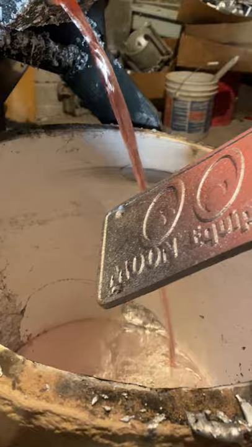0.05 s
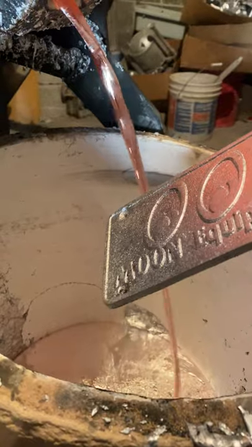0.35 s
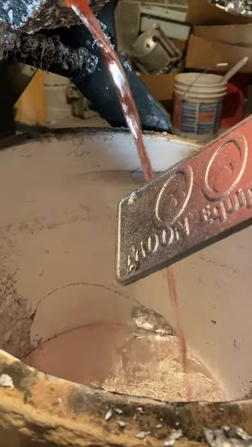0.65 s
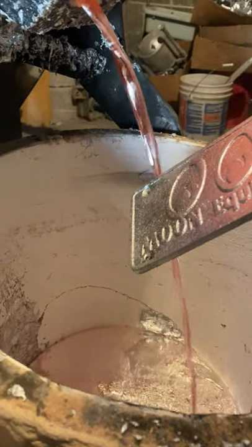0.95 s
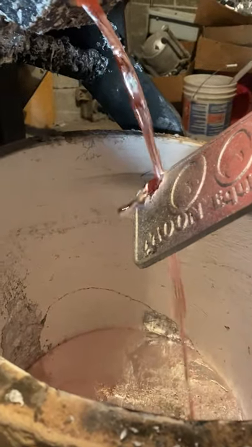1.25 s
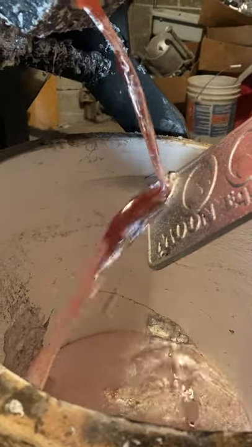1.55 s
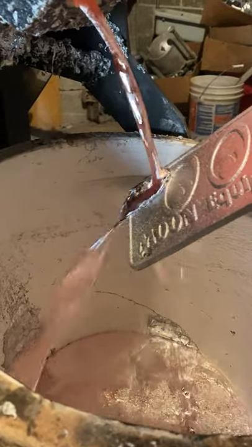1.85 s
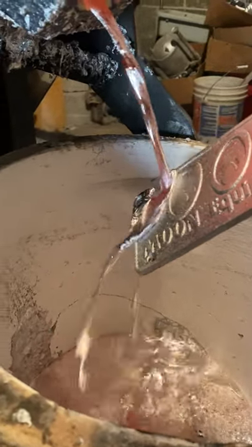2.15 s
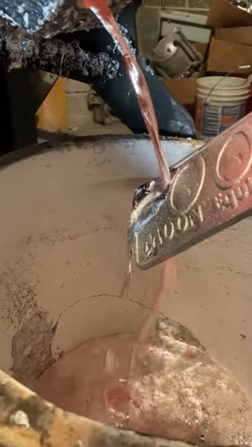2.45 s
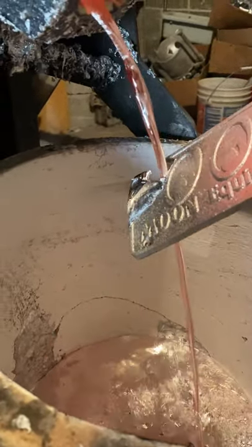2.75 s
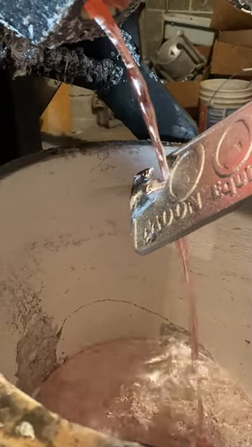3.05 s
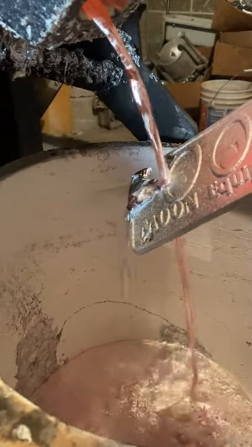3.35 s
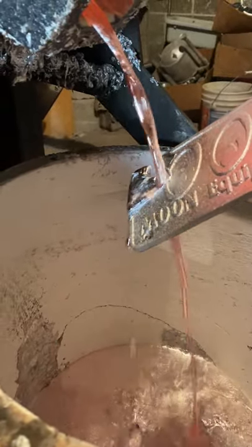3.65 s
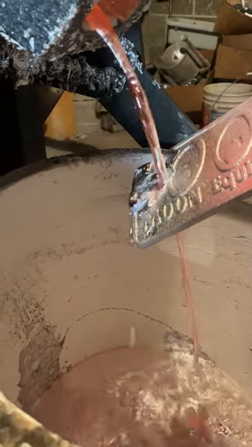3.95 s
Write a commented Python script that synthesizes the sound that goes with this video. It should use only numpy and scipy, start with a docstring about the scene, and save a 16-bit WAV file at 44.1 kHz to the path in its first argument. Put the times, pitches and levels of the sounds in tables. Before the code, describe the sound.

A melting furnace roars steadily in a workshop, with a low, surging boom and a hollow note. Its blower adds a faint hiss and whine. Near the end, spattering metal ticks softly. The stereo microphone is close.

```python
"""A low, surging boom over a broad roar: a melting furnace burns steadily in a workshop.
Turbulence in the flame drives the resonances of the chamber and a hollow note at its mouth, while
the blower adds the hiss of its air jet and a faint whine. A thin stream of metal is poured in
silence, apart from a few ticks of spatter near the end. The close stereo microphone's limiter
holds the boom down."""
import sys
import numpy as np
from scipy import signal
from scipy.fft import rfft, irfft
from scipy.io import wavfile
from scipy.ndimage import uniform_filter1d, minimum_filter1d

SR = 44100
rng = np.random.default_rng(int(sys.argv[2]) if len(sys.argv) > 2 else 0)


def inscribe(sig):
    """Save sig as 16-bit PCM at rate SR to the path in sys.argv[1].

    A 1-D sig is mono; a 2-D sig holds one channel per row.
    Samples are clipped to [-1, 1] before scaling.
    """
    pcm = np.round(np.clip(np.atleast_2d(sig).T, -1, 1) * 32767)
    wavfile.write(sys.argv[1], SR, pcm.astype(np.int16))


N = 176400
HZ, TIME = np.fft.rfftfreq(N, 1 / SR), np.arange(N) / SR


def amp(db):
    """Amplitude ratio: tenfold for every 20 decibels."""
    return 10 ** (np.asarray(db) / 20)


def unit(x):
    """Normalisation to an rms of 1."""
    return x / np.sqrt(np.mean(abs(x) ** 2) + 1e-20)


def white():
    """Spectrum of white noise: unit power per hertz on average."""
    return (rng.standard_normal(len(HZ)) + 1j * rng.standard_normal(len(HZ))) * np.sqrt(N * SR) / 2


def flutter(rate_hz, depth_db):
    """Random amplitude modulation: a gain that wanders at up to about the given rate."""
    wander = irfft(white() * HZ / (HZ + 7) / (1 + (HZ / rate_hz) ** 4), N)
    return amp(depth_db * unit(wander))


def swell(curve, depth):
    """Amplitude envelope of rms 1: a contour in decibels, scaled by depth."""
    time_s, contour_db = np.transpose(curve)
    return unit(amp(depth * np.interp(TIME, time_s, contour_db)))


def ringing(hz, width_hz):
    """Resonance filters turbulence to a narrow band, given as an analytic signal."""
    return unit(np.fft.ifft(white() / (1 + (2 * (HZ - hz) / width_hz) ** 2), N))


def steadied(wave, envelope, steadiness):
    """Amplitude compression: a ringing note, its swings partly evened out, follows an envelope."""
    compressed = wave / (abs(wave) ** 2 + 0.065) ** (steadiness / 2)
    return unit(compressed * envelope)


def place(wave, left_db, right_db, left_lead_rad):
    """A wave reaches the two microphone ports with differences of level and phase."""
    left = amp(left_db) * wave
    right = amp(right_db) * wave * np.exp(-1j * left_lead_rad)
    return np.sqrt(2) * np.array([left, right]).real


def resonances(table):
    """Superposition of modes, each driven by its own turbulence."""
    return sum(place(ringing(hz, width_hz), *stereo) for hz, width_hz, *stereo in table)


def coherent(a, b, coherence):
    """Partial coherence: noise that shares part of a and takes the rest of its power from b."""
    return coherence * a + np.sqrt(1 - coherence ** 2) * b


def broadband(table, left_lead_rad=0, ripple_db=1.27, ripple_hz=29.5):
    """Stereo noise with the fine peaks and dips of interference from the walls."""
    hz, *columns = np.transpose(table)
    left_db, right_db, coherence = (np.interp(np.log(HZ + 1), np.log(hz + 1), c) for c in columns)
    pattern = uniform_filter1d(rng.standard_normal(len(HZ)), int(ripple_hz / HZ[1]))
    ripple = amp(ripple_db * unit(pattern))
    a, b = white() * ripple, white() * ripple
    left = amp(left_db) * a
    right = amp(right_db) * coherent(a, b, np.clip(coherence, -1, 1)) * np.exp(-1j * left_lead_rad)
    return irfft(np.array([left, right]), N)


# Wandering centre of the boom: time_s, pitch_hz
BOOM_PITCH = [(0.05, 104.5), (0.13, 102.4), (0.189, 91.88), (0.62, 101.9), (0.76, 114.9), (1.0, 93.28),
              (1.25, 98.46), (1.549, 92.47), (1.751, 98.7), (1.891, 86.68), (2.099, 102.7), (2.18, 97.05),
              (2.5, 95.67), (2.57, 101.8), (2.629, 92.83), (2.829, 104.4), (2.88, 94.8), (3.05, 106.6),
              (3.4, 95.24), (3.74, 105.3), (3.81, 85.98), (3.98, 84.66)]
# Surges of the boom, before scaling by depth: time_s, contour_db
BOOM_SURGES = [(0.05, -5), (0.08, 3), (0.14, -14), (0.18, -1.5), (0.28, -8.0), (0.3, -3.5), (0.34, -5.5),
               (0.42, -0.5), (0.45, -9.5), (0.51, -3.5), (0.54, -17), (0.56, -4.5), (0.64, -2.5),
               (0.66, -7), (0.88, -4.5), (0.93, -11.5), (0.97, -3), (1.03, -10), (1.06, -3.5), (1.35, -7),
               (1.43, -8.5), (1.47, 0.0), (1.49, -15.5), (1.54, -5.5), (1.56, -10.5), (1.58, -4.5),
               (1.77, -6), (1.92, -6), (1.95, -8.5), (2.01, -2), (2.03, -10.5), (2.06, -4.5), (2.12, -8),
               (2.19, -3), (2.22, -7.5), (2.25, -1), (2.29, -9.5), (2.33, -1.5), (2.35, -7.5), (2.38, -1.0),
               (2.46, -2.5), (2.48, -11.5), (2.5, -7), (2.63, -4), (2.65, -13), (2.67, 0), (2.74, -11),
               (2.76, -3.0), (2.89, -6.5), (2.99, -1.5), (3.01, -7), (3.26, -4.0), (3.29, -7.5),
               (3.32, -2.5), (3.35, -11.5), (3.43, -3.5), (3.56, -7), (3.6, -2), (3.74, -4.5), (3.8, -9.5),
               (3.82, -4.0), (3.88, -9), (3.91, -4.5), (3.98, -8.5)]

def boom():
    """Noise-driven resonance: the flame excites the chamber's main mode, which wanders and surges."""
    time_s, pitch_hz = np.transpose(BOOM_PITCH)
    centre_hz = pitch_hz.mean()
    drift_hz = np.interp(TIME, time_s, pitch_hz) - centre_hz
    wave = ringing(centre_hz, width_hz=16.4) * np.exp(2j * np.pi * np.cumsum(drift_hz) / SR)
    wave = steadied(wave, swell(BOOM_SURGES, depth=1.37), steadiness=0.74)
    left, right = place(wave, left_db=-8, right_db=-15.5, left_lead_rad=0.73)
    tilt_db = -0.3275 * np.clip(HZ - centre_hz, -10, 40)  # the right port hears less as the boom rises
    return np.array([left, irfft(rfft(right) * amp(tilt_db), N)])


# Other modes of chamber and room: pitch_hz, width_hz, left_db, right_db, left_lead_rad
CHAMBER_MODES = [(55.6, 12, -28.5, -29.5, 0.2), (126.7, 24.3, -13.5, -29.5, -1.65),
                 (150.1, 24, -14.5, -23, -2), (180.8, 45.5, -16.5, -27, -3.0),
                 (208.1, 17, -15.5, -18.5, 3.5), (272.6, 25, -31, -31, -2.5), (300.7, 27, -30.5, -33, -2.5),
                 (940, 52, -49, -44, 2.5)]
# Flaring of the flame, shared with the roar, before scaling by depth: time_s, contour_db
FLARES = [(0.05, -37.5), (0.07, -32), (0.19, -36.5), (0.28, -34), (0.51, -34), (1.84, -33), (2.04, -36.5),
          (2.25, -31.5), (2.27, -36), (2.45, -28.5), (2.53, -36), (2.61, -33.5), (3.32, -34), (3.51, -33),
          (3.55, -36.5), (3.6, -29.5), (3.8, -34), (3.84, -29.5), (3.86, -36), (3.98, -29.5)]

def chamber():
    """Forced vibration: the modes of chamber and room swell slightly as the flame flares."""
    return resonances(CHAMBER_MODES) * swell(FLARES, depth=0.2)


# Swells of the mouth's note, before scaling by depth: time_s, contour_db
MOUTH_SWELLS = [(0.05, -22.5), (0.11, -13.5), (0.17, -26.5), (0.34, -12.5), (0.52, -16.5), (0.77, -17.0),
                (0.89, -22.5), (1.06, -21), (1.1, -11), (1.16, -19), (1.28, -16), (1.39, -22.5),
                (1.45, -14.5), (1.58, -23), (1.66, -16.5), (1.98, -18.5), (2.14, -15), (2.26, -16.5),
                (2.47, -18.5), (2.59, -21.5), (2.76, -15), (2.92, -23), (3.0, -14), (3.36, -20.5),
                (3.43, -11.5), (3.98, -20.5)]

def mouth():
    """Noise-driven resonance gives the furnace mouth a hollow note that swells and fades."""
    wave = steadied(ringing(hz=519, width_hz=50), swell(MOUTH_SWELLS, depth=0.8), steadiness=0.55)
    return place(wave, left_db=-22.5, right_db=-21.5, left_lead_rad=3)


# Spectral density of the flame's roar: frequency_hz, left_db, right_db, coherence
ROAR_SPECTRUM = [(100, -81, -80.5, 0.77), (250, -54, -57.5, 1), (350, -54, -55, 0.89), (432, -48, -49, 1),
                 (638, -53, -53.5, 1), (767, -61, -62, .96), (824, -59, -60.5, 0.82), (944, -62.5, -63, 1),
                 (1050, -68.5, -67, 0.99), (1176, -65, -67.5, 0.91), (1390, -72.5, -82, 0.12),
                 (1780, -84, -90.5, 0.66), (2640, -95, -93, 0.39), (5000, -120, -120, 1)]
# Spectral density of its gusts: frequency_hz, left_db, right_db, coherence
GUST_SPECTRUM = [(130, -77.5, -77.5, 0.75), (253, -62.5, -63.5, .9), (330, -61, -60.5, 1),
                 (455, -70, -70, .9), (610, -71.5, -72, .9), (1240, -82, -83, 0.96),
                 (3500, -120, -120, 0.25)]

def roar():
    """Turbulent combustion radiates fluttering broadband noise, with gusts at each flare."""
    burning = broadband(ROAR_SPECTRUM, left_lead_rad=3.068) * swell(FLARES, depth=0.25)
    gusts = broadband(GUST_SPECTRUM) * swell(FLARES, depth=2)
    return (burning + gusts) * flutter(rate_hz=34, depth_db=1.9)


def flame(mic_low_cut_hz=26):
    """Resonances and roar superpose, high-pass filtered by the microphone."""
    body = (chamber() + mouth()) * flutter(rate_hz=73, depth_db=1.0)
    pressure = body + roar() + boom()
    return irfft(rfft(pressure) / (1 + (mic_low_cut_hz / (HZ + 1)) ** 4), N)


# Spectral density of the draught: frequency_hz, left_db, right_db, coherence
DRAUGHT_SPECTRUM = [(5, -68.5, -79, .8), (18, -61, -63, .9), (40, -59.5, -62, 0.68),
                    (90, -66.5, -60.5, 0.55), (300, -82.5, -76, .5), (900, -120, -120, 0.19)]

def draught():
    """Flow noise: the draught rumbles evenly under the flame."""
    return broadband(DRAUGHT_SPECTRUM)


# Lesser tones of the blower: pitch_hz, width_hz, left_db, right_db, left_lead_rad
WHINE_TONES = [(1128, 19, -55.5, -57, 0.84), (1360, 13, -54.5, -53, 1), (4050, 8, -75, -70, .4),
               (5870, 25, -72, -73.5, .4)]
# Swells of its main tone, before scaling by depth: time_s, contour_db
FAN_SWELLS = [(.05, 1), (.35, 1.5), (1.0, 1), (1.35, 1), (1.7, -4), (2.3, -2.5), (2.9, -11), (3.98, -3)]
# Spectral density of its air jet: frequency_hz, left_db, right_db, coherence
JET_SPECTRUM = [(500, -77.5, -86, 0.23), (1410, -75.5, -77.5, .2), (2120, -78.5, -82, 0.76),
                (2330, -80, -83.5, 0.42), (3185, -83, -82, 0.21), (4000, -87, -85, 0.29),
                (4900, -82, -82, .55), (6110, -86, -87, .75), (6460, -93.5, -93, 0.56),
                (7190, -103, -103, 0.87), (8200, -119, -119, 0.53), (10900, -140, -140, .5)]

def blower():
    """Jet noise makes an even hiss; the blower's faint tones waver because they are narrow noise bands."""
    whine = resonances(WHINE_TONES)
    wave = steadied(ringing(hz=946.5, width_hz=15.5), swell(FAN_SWELLS, depth=0.99), steadiness=0.063)
    fan = place(wave, left_db=-52, right_db=-50, left_lead_rad=1.5)
    hiss = broadband(JET_SPECTRUM, left_lead_rad=0.62) * flutter(rate_hz=36, depth_db=0.38)
    return whine + fan + hiss


# Ticks of spattering metal: start_s, level_db, low_hz, high_hz, t60_s
SPATTER = [(3.5904, -22, 1300, 2750, 0.018), (3.59, -35, 2970, 5970, 0.011),
           (3.862, -18, 1500, 6560, 0.009), (3.8606, -21.5, 3450, 4400, 0.014),
           (3.867, -32, 3300, 5000, 0.012), (3.878, -31.5, 3200, 5100, 0.012)]

def tick(start_s, level_db, low_hz, high_hz, t60_s, rise_s=0.0016, tail_db=-29.5, tail_t60_s=0.3):
    """A transient with exponential decay: a fleck of metal snaps and leaves a short tail in the pot."""
    band = 1 / (1 + (low_hz / (HZ + 1)) ** 8) / (1 + (HZ / high_hz) ** 6) / (1 + (HZ / 6500) ** 13)
    a, b, *diffuse = (unit(irfft(white() * band, N)) for _ in range(4))
    age_s = np.maximum(TIME - start_s, 0)
    snap = np.array([a, coherent(a, b, coherence=0.62)]) * amp(-60 * age_s / t60_s)
    tail = np.array(diffuse) * amp(tail_db - 60 * age_s / tail_t60_s)
    return amp(level_db) * np.minimum(age_s / rise_s, 1) * (snap + tail)


def scene():
    """Superposition: flame, draught and blower sound throughout, and the spatter joins late."""
    return flame() + draught() + blower() + sum(tick(*row) for row in SPATTER)


def limit(x, ceiling, hold_s=0.009):
    """Peak limiting: each side's gain dips smoothly around every peak above the ceiling."""
    size = int(hold_s * SR)
    gain = minimum_filter1d(np.minimum(1, ceiling / (abs(x) + 1e-9)), size)
    return x * uniform_filter1d(uniform_filter1d(gain, size // 2), size // 2)


def record(dry, split_hz=242, image_hz=12000, image_db=-66, edge_hz=12300):
    """Two-stage limiting, bass first, then the converter's faint spectral image and the band limit."""
    bass = irfft(rfft(dry) / (1 + (HZ / split_hz) ** 8), N)
    held = limit(dry - bass + limit(bass, ceiling=0.94), ceiling=0.92)
    imaged = held * (1 + amp(image_db) * np.cos(2 * np.pi * image_hz * TIME))
    gate = np.clip(np.minimum(TIME - 0.036, TIME[-1] - TIME) / 0.001, 0, 1)  # opens at 36 ms; 1 ms fades
    low_pass = signal.firwin(511, edge_hz, window=("kaiser", 9), fs=SR)
    return signal.oaconvolve(imaged * gate, low_pass[None], "same")


dry = scene()
out = record(dry)
inscribe(out)
```